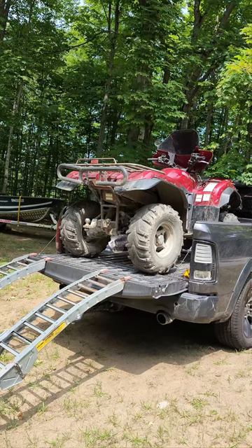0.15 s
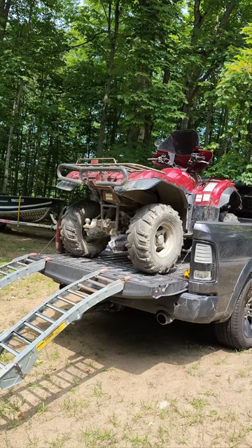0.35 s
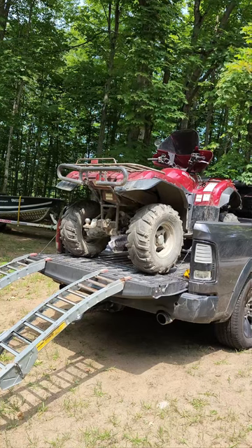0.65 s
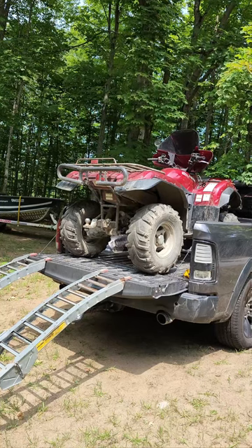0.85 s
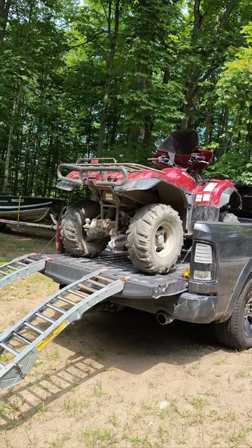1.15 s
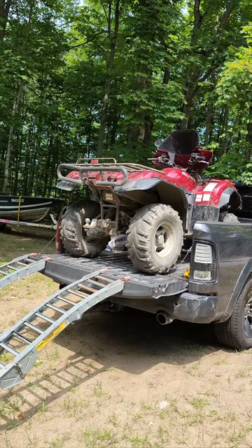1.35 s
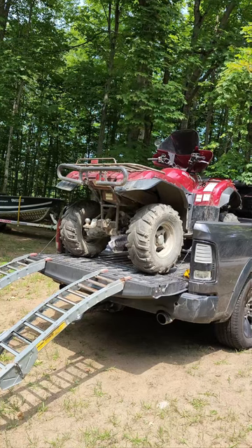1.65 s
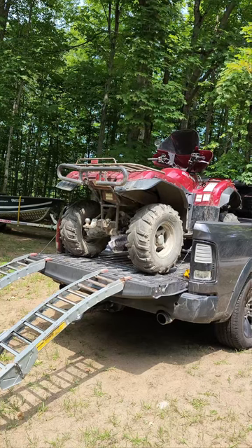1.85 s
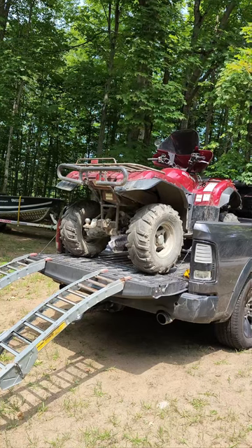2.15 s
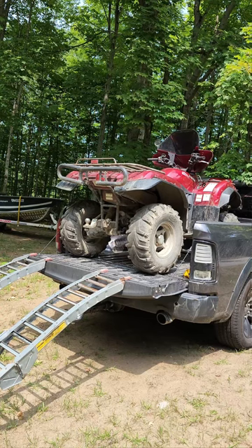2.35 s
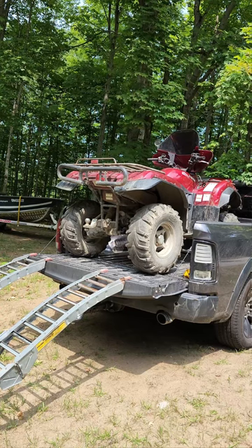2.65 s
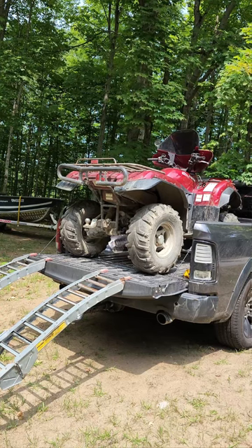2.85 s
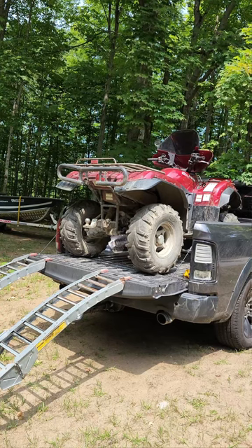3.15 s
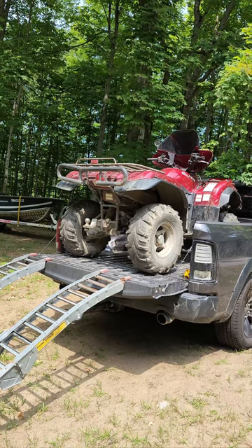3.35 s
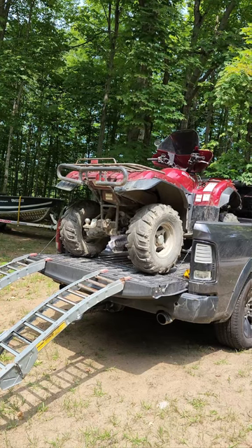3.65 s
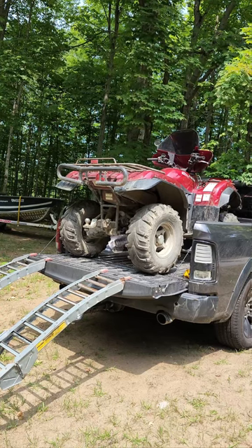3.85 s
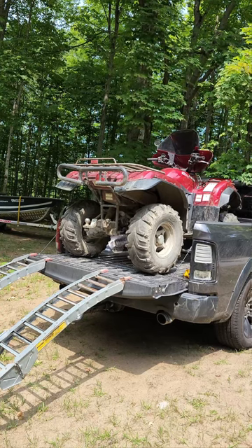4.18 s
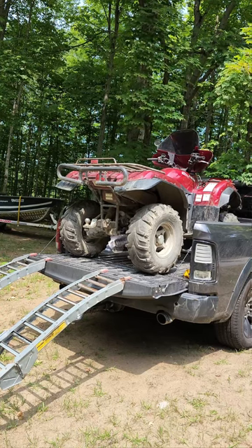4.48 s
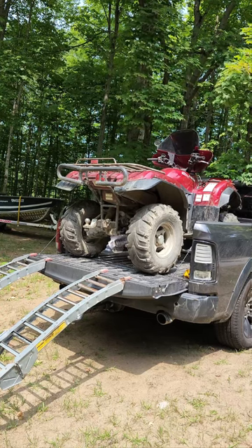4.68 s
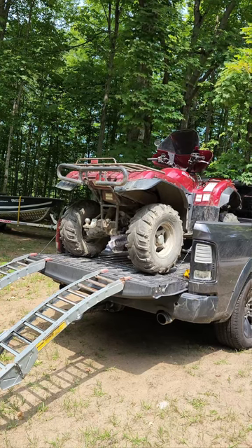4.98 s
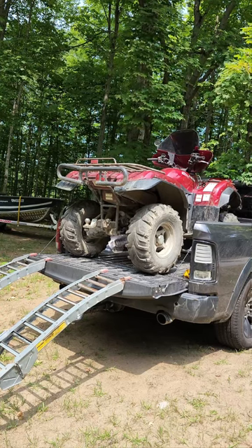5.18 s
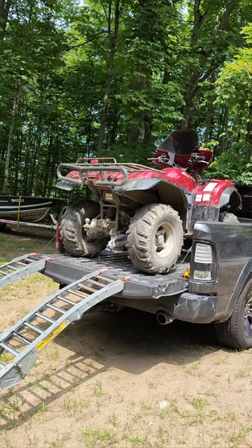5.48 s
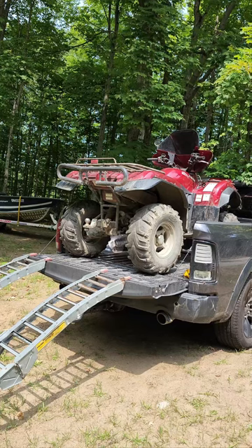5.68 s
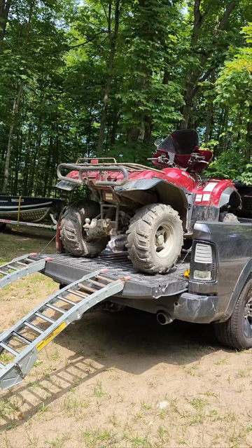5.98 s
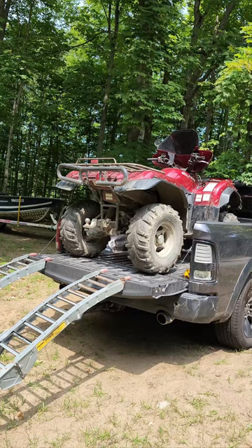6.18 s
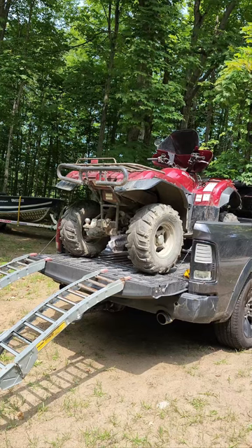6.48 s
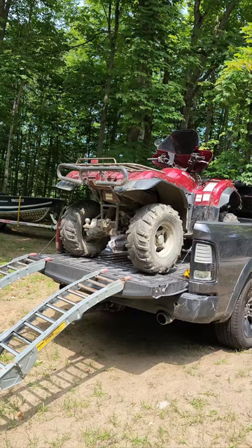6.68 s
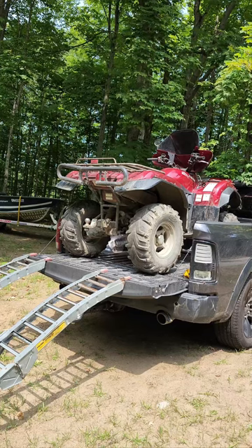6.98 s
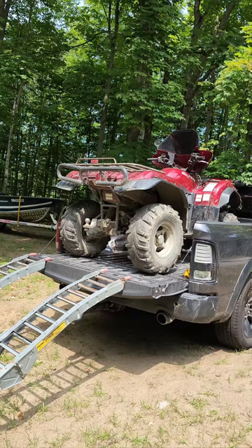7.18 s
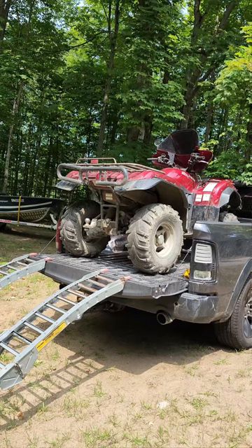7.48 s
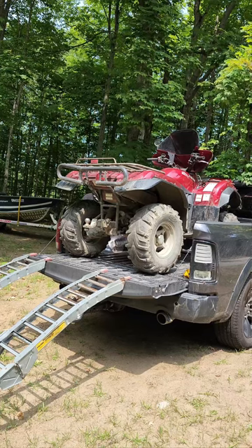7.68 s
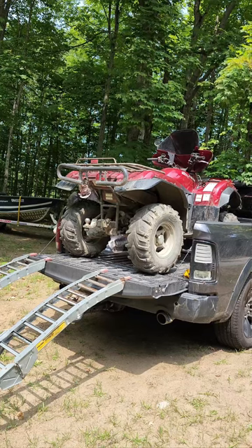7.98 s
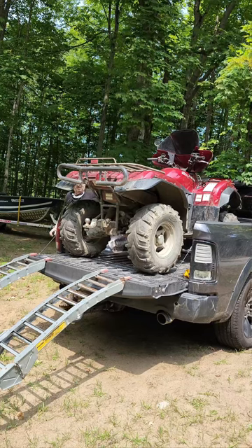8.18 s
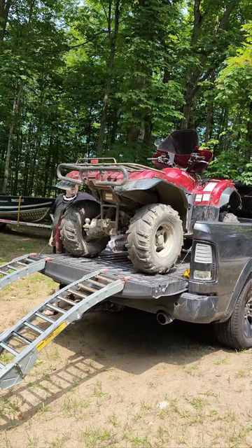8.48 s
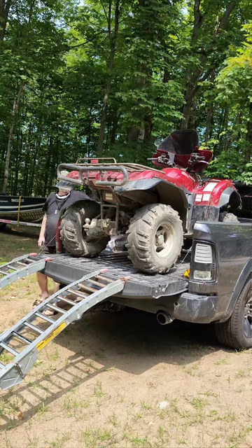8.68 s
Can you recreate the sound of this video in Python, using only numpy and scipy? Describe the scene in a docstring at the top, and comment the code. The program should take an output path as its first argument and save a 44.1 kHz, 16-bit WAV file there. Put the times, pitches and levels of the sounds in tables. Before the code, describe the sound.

Quiet open air, with regular high drooping bird pips and a thin insect-like whine. A few metres from a stereo microphone, steel buckles and hooks are handled on a truck bed: light clicks and low thumps at first, then loud hollow clunks, two short strap groans, a hard knock and a fast clatter with webbing zipping through. Afterwards it calms to soft loose strap rustling and a slight low hum.

```python
"""Buckles snap open and steel hooks drop and clatter as a quad bike's ratchet straps are let go in a pickup
bed. Each blow is a burst of noise and damped modes shaped by its contact time; the settling load thuds in low
modes. Webbing slides as grainy noise, and straps groan as short wavering tones. Two small birds at the edge of
a wood chirp in drooping sines, one in phrases, one in regular pips, scattered by the trees. Behind lie a thin
high whine of many sines, a hum, and filtered noise for air, hiss and a faint far rumble."""
import sys
import numpy as np
from scipy import signal
from scipy.fft import rfft, irfft, next_fast_len
from scipy.io import wavfile

SR = 44100
rng = np.random.default_rng(int(sys.argv[2]) if len(sys.argv) > 2 else 0)


def bounce(signal):
    """Save signal as a 16-bit WAV file at the path given by the first command-line argument."""
    frames = np.transpose(np.atleast_2d(signal))
    limited = np.clip(frames, -1, 1)
    pcm = np.round(limited * 32767).astype(np.int16)
    wavfile.write(sys.argv[1], SR, pcm)


N = 389403
TIME = np.arange(N) / SR   # s
EDGES = 28 * 2 ** (np.arange(29) * 0.3265)   # edges of the noise bands, Hz
CENTRES = np.sqrt(EDGES[1:] * EDGES[:-1])   # Hz
# likeness of the left and right sides: [frequency_hz, correlation]
LIKENESS = [(250, 0.98), (500, 0.89), (1000, 0.67), (2000, 0.029), (6000, 0.17), (13000, -0.2)]


def from_db(db):
    """Decibels to an amplitude ratio."""
    return 10 ** (np.asarray(db) / 20)


def rms_one(x):
    """Normalise the mean power to 1."""
    return x / np.sqrt(np.mean(x ** 2) + 1e-20)


def in_time(rows):
    """Linear interpolation of a curve at every sample."""
    return np.interp(TIME, *np.transpose(rows))


def at_hz(points, hz):
    """Interpolation on a logarithmic frequency axis."""
    f, value = np.transpose(points)
    return np.interp(np.log(hz), np.log(f), value)


def add(out, s, sound):
    """Superposition: mix a sound in at time s."""
    i = int(s * SR)
    sound = sound[..., max(-i, 0):]
    i = max(i, 0)
    out[..., i:i + sound.shape[-1]] += sound[..., :N - i]


def dying(t, t60):
    """Exponential decay: 60 dB are lost in t60 seconds."""
    return np.exp(-np.log(1000) * t / t60)


def drift(rate):
    """Random modulation: straight lines between normal deviates, rate of them per second."""
    return np.interp(TIME * rate, np.arange(4000), rng.standard_normal(4000))


def swell(s, db, swell_s, fade_s):
    """Exponential growth to a peak at time s, then exponential decay."""
    range_db = 23   # gained over a swell time, lost over a fade time
    distance = np.maximum((s - TIME) / swell_s, (TIME - s) / fade_s)
    return from_db(db - range_db * distance)


def noise_bands(ripple_db=0, ripple_hz=24):
    """Partly correlated stereo noise in bands of about a third octave; ripple crowds in narrow resonances."""
    size, bands = next_fast_len(N), []
    bin_hz = np.arange(size // 2 + 1) * SR / size
    peaks = np.interp(bin_hz / ripple_hz, np.arange(4000), rng.standard_normal(4000))
    spectrum = rfft(rng.standard_normal((2, 2, size))) * from_db(ripple_db * np.minimum(peaks, 2))
    noise = irfft(spectrum, size)[..., :N]
    for k, hz in enumerate(CENTRES):
        sos = signal.butter(2, EDGES[k:k + 2], "band", fs=SR, output="sos")
        if hz > 7000:
            sos = np.vstack([sos, sos])   # steeper skirts
        mid, side = signal.sosfilt(sos, noise[k % 2])
        alike = np.clip(at_hz(LIKENESS, hz), -1, 1)
        bands.append(rms_one(np.sqrt(1 + alike) * mid + np.sqrt(1 - alike) * side * [[1], [-1]]))
    return np.array(bands)


def coloured(bands, spectrum):
    """Spectral shaping: noise of rms 1, band amplitude being density times root of bandwidth."""
    gains = from_db(at_hz(spectrum, CENTRES)) * np.sqrt(CENTRES)
    return rms_one(np.tensordot(gains, bands, 1))


def mode(t, hz, t60):
    """A damped resonance: one decaying sine, its phase differing more between the sides where they are less alike."""
    skew = rng.normal() * np.arccos(np.clip(at_hz(LIKENESS, hz), -1, 1)) / 2
    phase = rng.uniform(0, 2 * np.pi) + np.array([[skew], [-skew]])
    return np.sin(2 * np.pi * hz * t + phase) * dying(t, t60)


def woods(bands, air_db=-61, hiss_db=-69.7, hiss_edge_hz=8800, rumble_db=-65.5, hum_hz=64.4):
    """Broadband noise shaped into air murmur, tree hiss and a surging low rumble, with a wavering sine as hum."""
    # murmur of the air: [frequency_hz, relative_density_db]
    air_spectrum = [(60, -9.5), (110, -3), (480, -8.5), (760, -2.5), (1100, -8), (1800, -21.5), (4500, -23),
                    (7000, -39), (15000, -46)]
    # high hiss of the trees: [frequency_hz, relative_density_db]
    hiss_spectrum = [(3700, -22), (4600, -5), (5200, 3), (6500, -6), (7600, -7), (8600, -12)]
    # surges of the low rumble: [peak_s, level_db, swell_s, fade_s]
    surges = [(2.4, -52, 0.99, 0.97), (3.4, -51.5, 0.49, 0.71)]
    # mean level of the low hum: [time_s, level_db]
    hum_level = [(0, -63.5), (8.15, -61), (8.4, -54)]
    air = from_db(air_db) * coloured(bands, air_spectrum)
    hiss = coloured(bands, hiss_spectrum)
    hiss = signal.sosfilt(signal.cheby1(10, 1, hiss_edge_hz, fs=SR, output="sos"), hiss)
    surging = from_db(rumble_db) + sum(swell(*surge) for surge in surges)
    rumble = surging * coloured(bands, [(28, -3.5), (45, 1), (100, -7), (300, -70)])
    hum_cycles = np.cumsum(hum_hz + 2 * drift(11.0)) / SR
    hum = from_db(in_time(hum_level) + 2 * drift(7.7)) * np.sin(2 * np.pi * hum_cycles)
    return air + from_db(hiss_db) * hiss + rumble + hum


def whine(climb_per_s=0.002, count=120):
    """Additive synthesis of an insect-like chorus: fluttering, creeping tones swell in turn; a few hold throughout."""
    # strength of the chorus tones: [frequency_hz, relative_db]
    chorus = [(5250, -1), (6500, -3), (7550, -1), (8750, -8)]
    # gain of the chorus as it builds up: [time_s, gain_db]
    chorus_gain = [(2.2, -75.5), (3.6, -73)]
    # strongest high tones, before drift: [frequency_hz, level_db]
    held_tones = [(6550, -81), (7060, -80.5), (7240, -79.5), (7560, -73.5)]
    out, t = np.zeros((2, N)), TIME[:3 * SR]
    waver = np.cumsum(7 * drift(50)) / SR   # cycles
    flutter = from_db(4 * drift(24))
    arch = np.sin(np.pi * t / t[-1])
    for hz in np.linspace(chorus[0][0], chorus[-1][0], count):
        start, i = rng.integers(-len(t), N), rng.integers(N - len(t))
        cycles = hz * t * (1 + climb_per_s * t / 2) + waver[i:i + len(t)]
        gain = from_db(at_hz(chorus, hz) + rng.normal())
        turns = cycles % 1 + rng.random((2, 1)) / 2   # each side has its own phase
        sine = np.sin((2 * np.pi * turns).astype(np.float32))
        add(out, start / SR, gain * arch * flutter[i:i + len(t)] * sine)
    out *= from_db(in_time(chorus_gain))
    for hz, db in held_tones:
        pitch_hz = hz * (1 - .014 * dying(TIME, 12)) + 10 * drift(40)   # creeps up
        cycles = np.cumsum(pitch_hz) / SR
        gain = from_db(db + 3 * drift(1.5) + 2.5 * drift(20))
        out += gain * np.sin(2 * np.pi * (cycles + rng.random((2, 1)) / 2))
    return out


def bird(start_hz=5090, droop_hz_per_s2=650000, spacing_s=.044, lead_db=-4, trees_t60=.25):
    """Frequency-modulated whistles hold, then droop, in pips and longer phrases; decaying noise scatters them."""
    # bouts of song: [start_s, phrase_count]
    bouts = [(-.035, 1), (0.543, 3), (2.76, 2), (4.17, 1), (7.28, 1)]
    phrase_every_s, phrase_note_s, phrase_db = .498, .034, -64
    pips_from_s, pips_every_s, pip_note_s, pip_db = .19, .578, .022, -66.5
    fade_db_per_s = .3   # later notes are softer
    out, calls = np.zeros(N), []
    for s, count in bouts:
        for k in range(round(count)):
            # note -1 is the soft low lead
            calls.append((s + k * phrase_every_s, phrase_note_s, phrase_db, (-1, 0, 1)))
    for s in np.arange(pips_from_s, TIME[-1], pips_every_s):
        calls.append((s, pip_note_s, pip_db, (0, 1)))
    for s, length, db, notes in calls:
        t = TIME[:int(length * SR)]
        shape = np.abs(np.sin(np.pi * np.sqrt(t / length)))   # quick rise, slow fade
        for k in notes:
            lead = k < 0
            hz = start_hz * (1 - .025 * lead) + rng.normal(0, 35)
            cycles = np.cumsum(hz - droop_hz_per_s2 * t ** 2) / SR
            note_db = db + lead_db * lead - fade_db_per_s * s + rng.normal(0, 1.5)
            note = from_db(note_db) * shape * np.sin(2 * np.pi * cycles)
            add(out, min(s + k * spacing_s, TIME[-1]), note)
    scatter = rng.standard_normal((2, SR)) * dying(TIME[:SR], trees_t60)
    return out + signal.oaconvolve(out[None], scatter / np.linalg.norm(scatter))[:, :N]


def groans(waver=0.0098):
    """Stick-slip oscillation: a strap slipping over a bar gives a short wavering tone."""
    # slips: [start_s, level_db, mean_pitch_hz, length_s]
    slips = [(5.465, -50, 575, 0.062), (5.707, -46.5, 727, 0.11)]
    out = np.zeros(N)
    for s, db, hz, length in slips:
        t = TIME[:int(length * SR)]
        cycles = np.cumsum(hz * (1 + waver * drift(124)[:len(t)])) / SR
        add(out, s, from_db(db) * np.sin(np.pi * t / length) * np.sin(2 * np.pi * cycles))
    return out


def webbing(bands, catches_per_s=200, catch_db=-1, catch_s=.002):
    """Friction noise: the weave catches in short grains, bright when taut, duller and smoother when loose."""
    # pulls: [fastest_slip_s, level_db, swell_s, fade_s, tautness_0_to_1]
    pulls = [(4.729, -45.5, 0.24, 0.23, 0.71), (5.658, -48, 0.02, 0.058, 0.76),
             (5.755, -49, 0.38, 0.17, 0.66), (6.842, -38, 0.33, 0.18, 0.79), (8.22, -50.5, 1, 0.46, 0),
             (8.83, -50.5, 0.28, .3, 0)]
    # taut over the bed: [frequency_hz, relative_density_db]
    taut_spectrum = [(300, 11.5), (800, -5.5), (2000, -11), (3500, -14), (6500, -5.5), (9800, -40.5),
                     (12200, -4), (15500, -37)]
    # dragged loose: [frequency_hz, relative_density_db]
    loose_spectrum = [(250, -24), (500, -1), (1900, 3.5), (3700, -5.5), (6500, -2.5), (9800, -24),
                      (11800, -21), (15500, -25)]
    catches = (rng.random(N) < catches_per_s / SR) * rng.exponential(1, N)
    ringing = signal.lfilter([1], [1, -np.exp(-1 / (catch_s * SR))], catches)
    grain = rms_one(1 + from_db(catch_db) * ringing)
    tight = grain * coloured(bands, taut_spectrum)
    loose = np.sqrt(grain) * coloured(bands, loose_spectrum)
    out = 0
    for *stroke, taut in pulls:
        out = out + swell(*stroke) * (loose + np.clip(taut, 0, 1) * (tight - loose))
    return out


def thuds(level_db=-6.0, t60=0.33, rise_s=0.0013):
    """Modal excitation by a soft push: the shifting load wakes a small cluster of low panel modes."""
    # shifts of the load: [start_s, relative_db, base_pitch_hz]
    shifts = [(0.039, -37, 253.5), (0.404, -47.5, 279), (1.817, -39.5, 232.6), (2.262, -39, 180.3),
              (3.073, -50, 300), (3.136, -37, 181), (3.334, -28, 142.2), (3.377, -26.5, 97.6),
              (3.926, -46, 253), (4.988, -26, 300), (5.219, -41.5, 236.8), (5.327, -40, 186.5),
              (5.635, -29, 177.5), (5.802, -37, 79.7), (6.627, -34, 197)]
    cluster = [(.66, -0.5), (.83, 1), (1, 3.5), (1.24, -0.5), (1.8, -9.5)]   # (pitch ratio, relative dB)
    out, t = np.zeros((2, N)), TIME[:SR // 2]
    for s, db, hz in shifts:
        panel = 0
        for ratio, mode_db in cluster:
            panel = panel + from_db(mode_db) * mode(t, hz * ratio * rng.normal(1, 0.025), t60)
        add(out, s, from_db(db + level_db) * np.minimum(t / rise_s, 1) * panel)
    return out


def contacts(usual_contact_s=0.0046, snap_clank_db=-5.5, knock_tick_db=-23):
    """Contact time sets brightness: hooks are duller the longer they touch; buckles have set tick levels."""
    # buckles snapping open: [start_s, clack_db, thump_rel_clack_db, steel_rel_clack_db, tick_rel_steel_db,
    # ring_hz, ring_rel_db, contact_s]
    snaps = [(0.711, -55, 0.5, -18, 1, 323, 8.5, 0.0027), (2.098, -45.5, 5.5, -0.5, -4, 4300, 3, 0.0028),
             (2.8, -48.5, -1, -10, -9, 360, 12, 0.017), (3.32, -40, 10, 1, 1.5, 403, 7.5, 0.00096),
             (3.393, -59, 23, 5, -0.5, 193, 1, 0.0038), (4.738, -49, -14, -3.5, -11.5, 2380, 8, 0.0022),
             (6.405, -37.5, 8.5, -10.5, -12, 662, 17, 0.0018)]
    # hooks knocking on the bed: [start_s, clack_db, thump_rel_clack_db, clank_rel_clack_db,
    # clink_rel_clack_db, ring_hz, ring_rel_db, contact_s]
    knocks = [(1.292, -52, 1.5, -9, -15.5, 1560, 7, 0.0036), (1.333, -58, 6, -32, -9, 2546, 3, 0.003),
              (2.244, -48, -11, -23.5, -11, 160, -2, 0.0059), (2.615, -66, -25, -6.5, -8, 2550, 9, 0.011),
              (3.292, -52, 17, -3.5, 3, 2250, 12.5, 0.011), (4.694, -44, 2.5, -37, -19, 573, 11, 0.0082),
              (4.76, -29.5, -6.5, -16, -29, 174.7, 14, 0.018),
              (4.886, -25, -11, -0.5, -15.5, 728, 3, 0.0073), (4.969, -27, -4, -19, -28, 365.5, 7.5, 0.015),
              (5.58, -52.5, 14.5, -8, -4.5, 236, 8, 0.0057), (5.656, -46.5, -6, -5.5, -22, 770, 3, 0.031),
              (6.244, -24.5, 2, -2.5, -23.5, 855, 4.5, 0.0057),
              (6.494, -42, -29, -6.5, -15.5, 1065, 4.5, 0.013),
              (6.668, -50, 0, 10.5, -4.5, 1920, 3, 0.0076), (6.713, -28, 5.5, -6.5, -6, 253.5, 6, 0.0073),
              (6.749, -35, 1, 5.5, -4, 1834, 2, 0.0014), (6.768, -35, 7, -1.5, -14, 2120, 7, 0.0018),
              (6.839, -26.5, 1, -5.5, -59, 336, 8, 0.00087), (7.264, -55, 8, -6, -24, 154, 2, 0.0034)]
    # frame, spring and lever of a buckle: [frequency_hz, relative_db, t60_s]
    buckle_modes = [(1480, 9.5, 0.07), (3050, 4, 0.089), (5420, 9, 0.054), (5980, 10, 0.086),
                    (7110, -4, .12)]
    # steel of the hooks: [frequency_hz, relative_db, t60_s]
    hook_modes = [(1276, -4, .18), (1525, -2.5, 0.37), (1673, -7.5, 0.11), (1817, -15.5, 0.099),
                  (2155, -1, 0.17), (2310, 3, 0.15)]
    for s, db, thump_db, steel_db, tick_db, hz, ring_db, contact_s in snaps:
        colour_db = (thump_db, 0, steel_db + snap_clank_db, steel_db, steel_db + tick_db)
        yield s, db, colour_db, hz, ring_db, contact_s, buckle_modes
    for s, db, thump_db, clank_db, clink_db, hz, ring_db, contact_s in knocks:
        tick_db = knock_tick_db - 20 * np.log10(contact_s / usual_contact_s)
        colour_db = (thump_db, 0, clank_db, clink_db, clink_db + tick_db)
        yield s, db, colour_db, hz, ring_db, contact_s, hook_modes


def blows(bands, crack_db=4, crack_t60=0.14, tail_db=-19, tail_t60=1.0, rattle_db=4, grit_db=3):
    """Impact excitation: a gritty crack, crowded and single modes of bed and steel, and a faint uneven rattle."""
    # colour common to all blows: [frequency_hz, relative_db]
    common_colour = [(45, -65), (80, -20), (115, -18), (165, 3), (260, 3), (700, 2), (1500, 5.5), (2600, 3),
                     (5500, 11.5), (7500, 9), (9800, -2), (12300, 12), (15500, -9)]
    # ring time of bed and hardware: [frequency_hz, t60_s]
    ring_time = [(80, 1), (250, 0.4), (700, 0.43), (1800, 0.24), (5000, 0.027), (13000, 0.11)]
    # panels of the bed: [frequency_hz, relative_db, t60_s]
    panel_modes = [(173.8, -6, 0.54), (247.5, 2, 0.51), (332.4, 8, 0.16), (407.3, -1.5, 0.4),
                   (549.7, 1.5, 0.26), (667, 4.5, 0.24), (734, 1, 0.27), (881, 4.5, 0.14), (1082, 5, 0.2)]
    noisy_db, panels_db, struck_t60 = -8.5, -6.5, .22
    tail_top_hz = 3500   # above this the rattle dies twice as fast
    out, t = np.zeros((2, N)), TIME[:SR // 2]
    early = SR // 30   # samples over which each band is brought to level
    rattle = from_db(tail_db + rattle_db * drift(45))
    crack = from_db(crack_db + grit_db * drift(250))
    for s, db, colour_db, hz, ring_db, contact_s, own_modes in contacts():
        # thump, clack, clank, clink, tick
        hardness = list(zip((260, 650, 1600, 4200, 11500), colour_db))
        gains = from_db(noisy_db + at_hz(hardness, CENTRES) + at_hz(common_colour, CENTRES))
        i, hit = rng.integers(N - len(t)), 0
        snap = crack[i:i + len(t)] * dying(t, crack_t60)
        tail = rattle[i:i + len(t)] * dying(t, tail_t60)
        for band, centre, gain, t60 in zip(bands, CENTRES, gains, at_hz(ring_time, CENTRES)):
            attack = np.minimum(t / (contact_s + 1 / centre), 1)   # lows need a cycle to build up
            band_tail = tail if centre < tail_top_hz else tail * dying(t, tail_t60)
            envelope = attack * (dying(t, t60) + snap + band_tail)
            crowd = band[:, i:i + len(t)] * envelope
            hit = hit + gain * crowd / np.sqrt(np.mean(crowd[:, :early] ** 2))
        tones = from_db(ring_db + at_hz(hardness, hz)) * mode(t, hz, struck_t60)
        for mode_hz, mode_db, t60 in panel_modes:
            spot_db = rng.normal(0, 2.5)   # each blow wakes the panels differently
            gain = from_db(panels_db + mode_db + at_hz(hardness, mode_hz) + spot_db)
            tones += gain * mode(t, mode_hz, t60)
        for mode_hz, mode_db, t60 in own_modes:
            tones += from_db(mode_db + at_hz(hardness, mode_hz)) * mode(t, mode_hz, t60)
        add(out, s, from_db(db) * (hit + np.minimum(t / contact_s, 1) * tones))
    return out


def scene(left_db=1.0, lean_hz=1500):
    """Superposition: truck noise is resonant, the woods' is not; all lows but bird and whine lean left."""
    resonant = noise_bands(ripple_db=4.5)
    mix = blows(resonant) + thuds() + webbing(resonant) + groans() + woods(noise_bands())
    lows = signal.lfilter(*signal.butter(1, lean_hz, fs=SR), mix)
    leaning = mix + lows * (from_db([[left_db], [-left_db]]) - 1)
    return leaning + bird() + whine()


def record(dry, cutoff_hz=15650):
    """Low-pass filtering: an elliptic filter cuts the top steeply."""
    return signal.sosfilt(signal.ellip(12, .2, 80, cutoff_hz, fs=SR, output="sos"), dry)


dry = scene()
out = record(dry)
bounce(out)
```